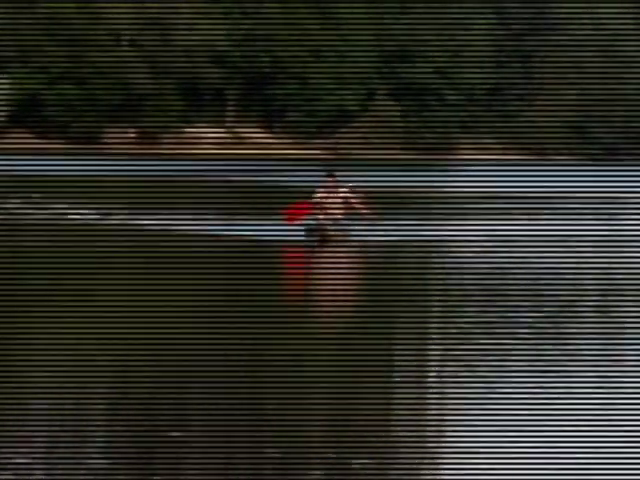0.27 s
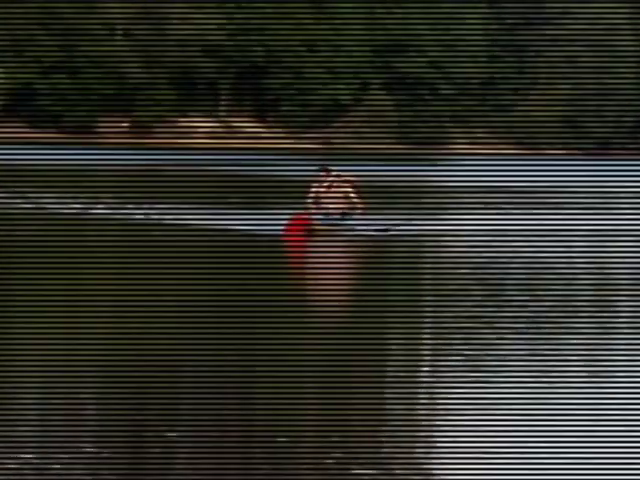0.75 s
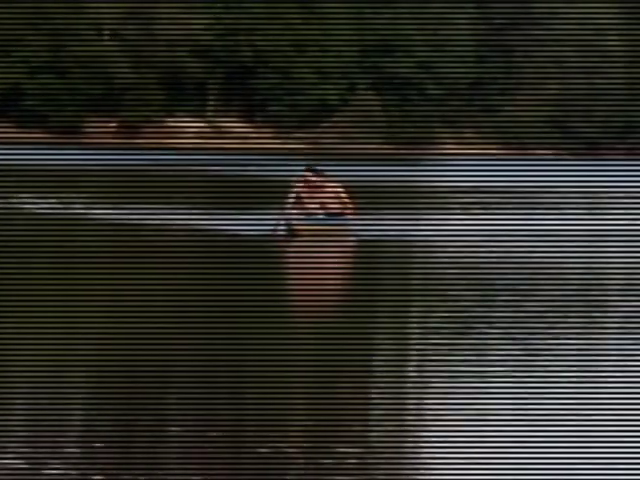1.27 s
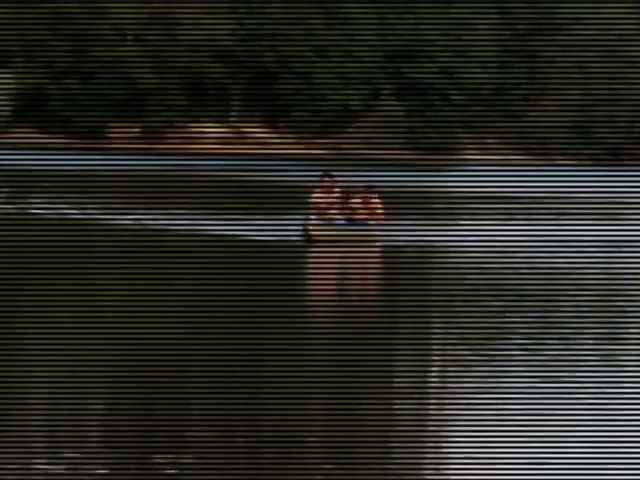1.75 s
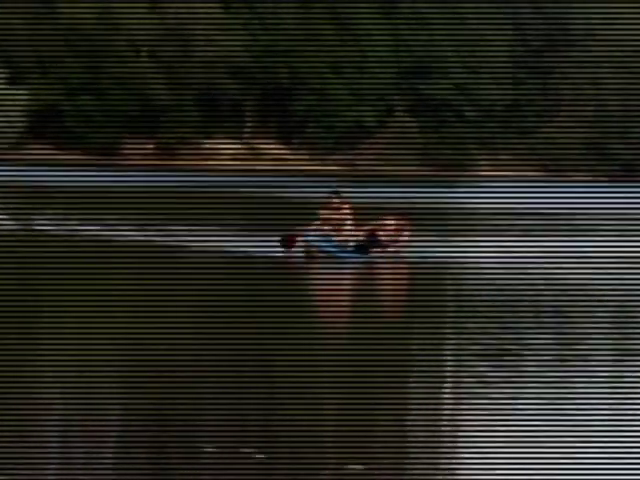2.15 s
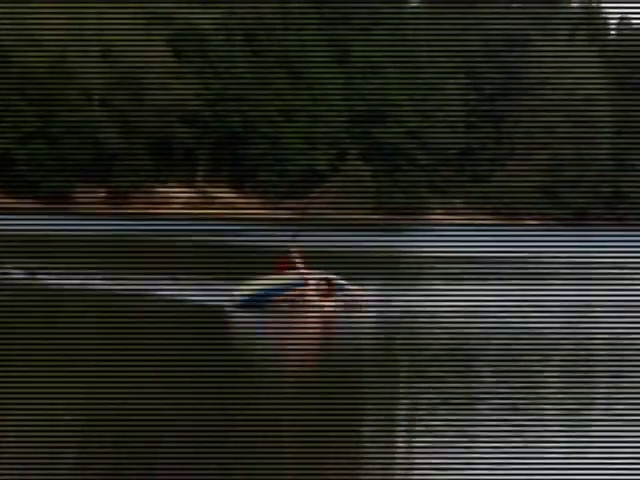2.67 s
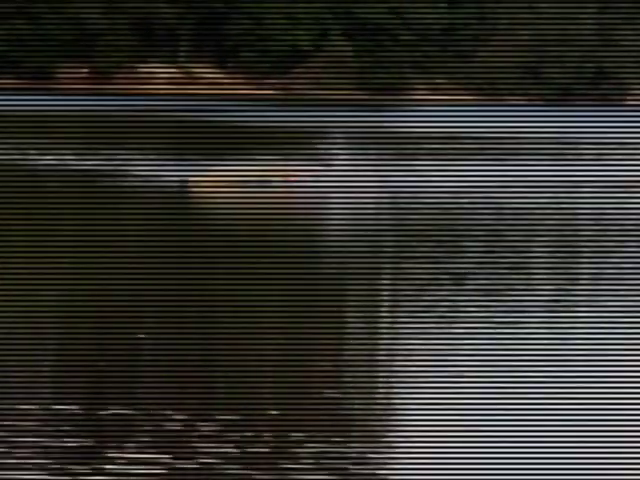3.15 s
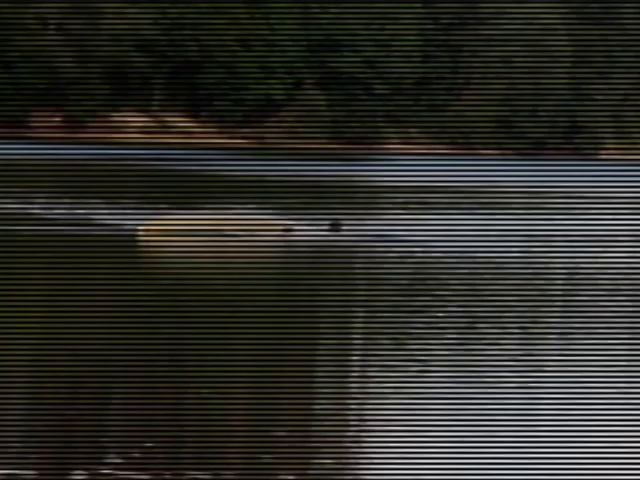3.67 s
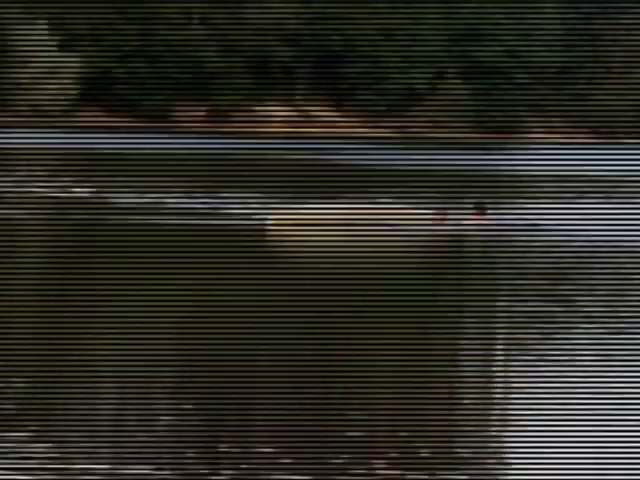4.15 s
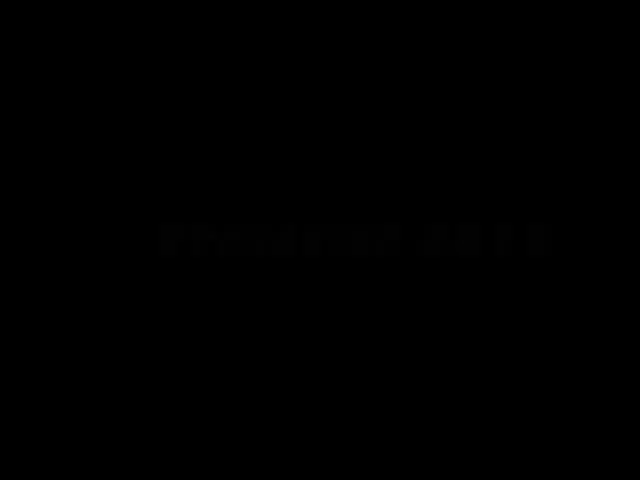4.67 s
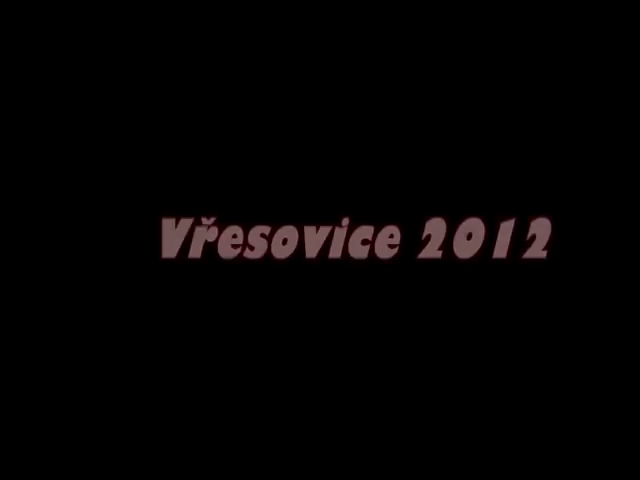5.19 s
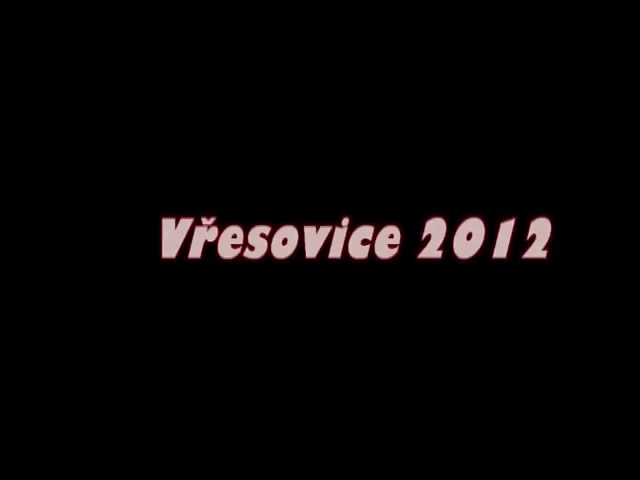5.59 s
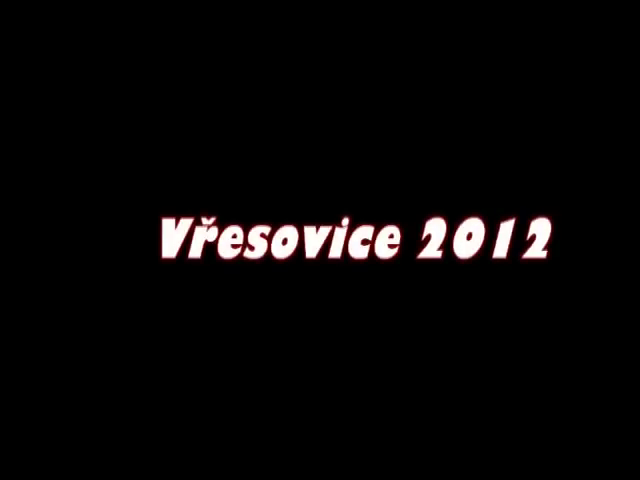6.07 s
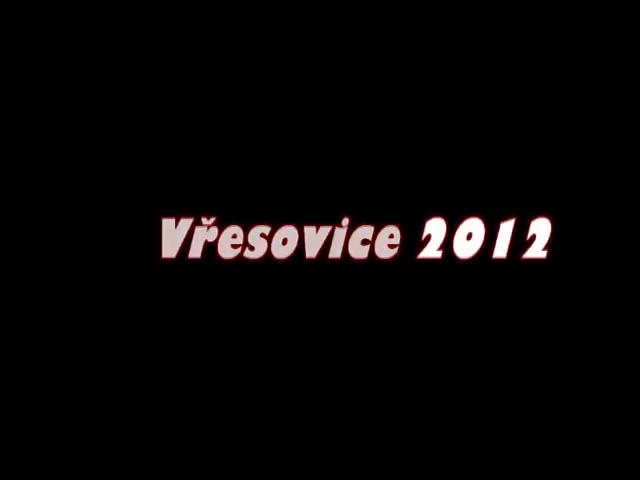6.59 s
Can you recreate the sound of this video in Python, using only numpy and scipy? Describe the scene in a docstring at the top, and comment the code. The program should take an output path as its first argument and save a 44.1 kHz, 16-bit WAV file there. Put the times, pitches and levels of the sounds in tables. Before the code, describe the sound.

Water drips close by on a lake, making low, short plops at uneven intervals, many in quick little clusters. Light splashes and slaps fall between them, and now and then a small bubble rings and rises in pitch. The plops start sparse, then come louder and more often in the second half. A faint machine hum, low rumble and soft hiss lie far behind.

```python
"""Close water drips

Each drop ticks on the surface and shoves the water with a low plop. Its crater closes and snaps shut
with two more plops and throws up a jet that falls back softly. Splashes slap in between, and now and
then a trapped bubble rings and rises in pitch. Behind it lie a faint machine hum, a soft swelling
tone, low rumble and hiss."""
import sys
import numpy as np
from scipy import signal
from scipy.fft import rfft, irfft, next_fast_len
from scipy.io import wavfile
from scipy.ndimage import uniform_filter1d, map_coordinates

SR = 44100
rng = np.random.default_rng(int(sys.argv[2]) if len(sys.argv) > 2 else 0)


def inscribe(sig):
    """Save sig as 16-bit PCM at rate SR to the path in sys.argv[1].

    A 1-D sig is mono; a 2-D sig holds one channel per row.
    Samples are clipped to [-1, 1] before scaling.
    """
    pcm = np.round(np.clip(np.atleast_2d(sig).T, -1, 1) * 32767)
    wavfile.write(sys.argv[1], SR, pcm.astype(np.int16))


N = 301203
TIME = np.arange(N) / SR  # scene clock, s
AGE = np.arange(SR // 2) / SR  # age of one hit, s

# Drops that open a crater. Each row: start in seconds, impact level in dB, tick level in dB,
# delay in seconds and level in dB of the walls rushing in, then the same two for the crater shutting.
DRIPS = [(.0048, -17.5, -19, 0.027, -15.5, 0.039, -20), (0.5708, -21, -35, 0.027, -21.5, 0.034, -29),
         (1.6144, -7, -32.5, 0.018, -12, .032, -13.5), (2.5133, -7.5, -46, 0.031, -12, .045, -8),
         (3.247, -7.5, -26, .033, -14, 0.046, -12.5), (3.742, -6.5, -26, 0.03, -14, .044, -9.5),
         (3.9511, -9, -32.5, .029, -9.5, 0.043, -7), (4.482, -9.5, -37, 0.036, -8.5, 0.052, -11),
         (5.0561, -8.5, -26.5, .035, -9.5, .047, -9.5), (5.7036, -11, -29.5, 0.03, -18, .042, -14.5),
         (5.9658, -8, -29.5, .024, -15.5, 0.041, -13.5), (6.5666, -8.5, -27, 0.023, -13.5, 0.04, -8.5)]
# Plops without a crater. Each row: start in seconds, level in dB, base pitch in Hz, t60 in seconds,
# deep boom in dB against the plop.
LONE_PLOPS = [(.348, -37, 205, 0.038, -17), (.4315, -10.5, 156, 0.032, -4.5),
              (1.7532, -23.5, 217, 0.028, -4), (2.799, -36, 168, 0.07, -4),
              (3.4038, -12.5, 196, .044, -6.5), (3.5027, -24, 169, 0.07, -12), (3.5678, -25, 173, .06, -6),
              (5.618, -29.5, 197, 0.0094, -17.5), (5.8633, -17, 194, 0.023, -12),
              (6.2157, -14, 188, 0.087, -32)]
# The shoves in a crater's life. Each: base pitch in Hz, t60 in seconds, boom in dB against the plop.
IMPACT, CLOSING = (181, 0.015, -1.8), (171.3, 0.025, -16.5)
SHUT, JET = (182, 0.014, -4.5), (170, 0.052, -1)
# Trapped air. Each row: start in seconds, level in dB, base pitch in Hz, seconds to reach the surface.
BUBBLES = [(.0015, -13, 5100, 0.065), (.002, -22, 2820, .04), (.037, -12, 1228, 0.043),
           (0.129, -36, 2750, 0.0069), (0.571, -29, 3190, .006), (1.7566, -7, 2864, 0.01),
           (1.766, -4.5, 2550, 0.51), (4.532, -11, 4775, .06), (4.532, -18, 2130, 0.024),
           (4.533, -5, 1322, 0.047), (4.541, -18, 1820, 0.013), (4.558, -24.5, 1237, .03),
           (4.583, -30.5, 1950, .019), (4.604, -26.5, 2290, 0.011), (4.721, -34.5, 3900, .05),
           (5.104, -6.5, 1075, .085), (5.104, -19, 1385, 0.0099), (5.168, -27, 1700, 0.0054),
           (6.619, -6, 1788, 0.031), (6.623, -6, 1934, .17), (6.628, -15, 1605, 0.034),
           (6.64, -26, 3000, 0.0079), (6.655, -22.5, 1900, 0.014), (6.712, -34, 2580, 0.0062)]
# Splashes and the spray landing after them. Each row: start in seconds, relative level in dB,
# t60 in seconds, brightness in dB per octave.
SPLASHES = [(.0015, -6.5, 0.0084, -2), (.0387, -13.5, 0.018, -2.5), (.054, -19, 0.0073, 3),
            (.108, -31, 0.0082, 4), (.270, -34, 0.0099, -7.5), (.5712, -18.5, 0.0075, -11.5),
            (.80, -38.5, 0.031, -13), (1.7565, -10, 0.0018, -8), (1.7662, -20.5, 0.0095, 2),
            (3.4046, -21.5, 0.0043, 3), (3.406, -26, 0.024, -19), (3.565, -38, .04, -13.5),
            (4.531, -14.5, 0.017, 3), (4.658, -34.5, 0.0078, 34), (4.712, -27.5, 0.009, -12),
            (5.1035, -8.5, .016, -7), (5.864, -29, 0.0065, 1), (5.954, -16, 0.011, -18),
            (6.5913, -26, 0.018, 12), (6.610, -30, 0.022, 12), (6.619, -15.5, 0.034, -1),
            (6.625, -13, 0.015, -2), (6.770, -37, 0.01, 2)]
# A drop's surface noises. Each: t60 in seconds, brightness in dB per octave.
TICK, DULL_SLAP = (0.0041, 0.86), (0.014, -17)
# The ring of a sharp tick. Each row: pitch in Hz, relative level in dB, t60 in seconds.
TICK_MODES = [(2828, 2, 0.0095), (4793, -2, 0.011), (5600, -8, 0.015)]
# EQ curves for the noise layers. Each row: frequency in Hz, relative level in dB.
SMACK_EQ = [(150, -11.5), (330, -37.5), (450, 16), (720, 1.5), (950, -9), (1400, -5), (2500, -39.5),
            (5000, -86.5)]
SWAY_EQ = [(10, -15.5), (26, 11), (40, -4), (70, -9.5), (120, -16.5), (220, -15), (400, -26.5),
           (800, -85.5)]
SPRAY_EQ = [(250, -22.5), (650, 1.5), (900, -11), (1500, 1), (2200, 3), (2900, 3), (3600, 3), (4200, 0),
            (5000, 0), (5600, -14.5), (6300, -4.5), (7100, -39.5), (8000, -32), (18000, -86)]
RUMBLE_EQ = [(15, -6.5), (45, -17.5), (62, -5.5), (105, -1.5), (140, -7), (175, -6), (240, -13.5),
             (330, -22.5), (600, -46.5), (1000, -85.5)]
HISS_EQ = [(120, -27.5), (300, -6), (480, -9), (700, -11), (1200, -11), (3700, -13.5), (5500, -20),
           (6500, -30), (7300, -44), (9000, -64.5), (12000, -110)]
# The tail of the surroundings. Each row: frequency in Hz, t60 in seconds.
ECHO_DECAY = [(40, 0.19), (200, 0.36), (1000, 0.09), (2000, 0.27), (6000, 0.073)]
# The machine's harmonics. Each row: multiple of the motor's pitch, relative level in dB.
HUM_HARMONICS = [(1, -51), (2, -61.5), (3, -59.5), (5, -57.5), (6, -70.5), (7, -63.5), (9, -72),
                 (10, -93.5), (11, -68), (13, -69), (17, -90)]
# Swells of the low tone. Each row: crest time in seconds, pitch in Hz, relative level in dB.
DRONE_SWELLS = [(1.201, 139.8, -54.5), (2.648, 132.6, -43), (3.251, 131, -40), (5.55, 166.1, -55.5),
                (6.5, 163.5, -43.5)]
# Fader moves for the noise bed. Each row: time in seconds, relative rumble and hiss levels in dB.
BED_FADERS = [(0.0, -23, -50), (0.21, -45, -55), (0.84, -47, -52.5), (1.14, -46, -51.5), (3.14, -43, -50.5),
              (3.42, -31.5, -49.5), (5.0, -48.5, -53), (5.55, -47.5, -53), (5.99, -34, -52),
              (6.41, -47.5, -49.5), (6.83, -56, -54.5)]


def shove_cues(jet_delay_s=0.16, jet_db=-22):
    """A drop strikes, its crater closes and snaps shut, its jet falls back; lone plops come between."""
    cues = []
    for start, db, _, closing_s, closing_db, shut_s, shut_db in DRIPS:
        cues += [(start, db, *IMPACT), (start + closing_s, closing_db, *CLOSING),
                 (start + shut_s, shut_db, *SHUT), (start + jet_delay_s, db + jet_db, *JET)]
    return cues + list(LONE_PLOPS)


def plops(attack_s=0.005, glide=0.36, glide_t60=0.04, steepen=0.82, smack_db=-19, smack_t60=0.028,
          boom_hz=71, boom_t60=0.15, boom_lag_s=0.0027, sway_db=-30, sway_t60=0.59):
    """Each shove swells, sinks in pitch, dies fast and leaves the body of water booming and swaying."""
    out = np.zeros(N)
    for start, db, hz, t60, boom_db in shove_cues():
        attack = 1 - np.exp(-(AGE / attack_s) ** 3)
        envelope = attack * fade(t60)
        pitch = hz * (1 + glide * fade(glide_t60))
        shove = envelope / envelope.max() * np.cos(phase_of(pitch))
        # hard shoves have pointed crests and a dull smack
        shove *= 1 + steepen * (amp(db) * shove) ** 2
        smack_envelope = attack * fade(smack_t60)
        smack = amp(smack_db + db) * smack_envelope / smack_envelope.max() * noise(SMACK_EQ, len(AGE))
        boom = -amp(boom_db) * attack * fade(boom_t60) * np.sin(2 * np.pi * boom_hz * (AGE - boom_lag_s))
        sway = amp(sway_db) * attack * fade(sway_t60) * noise(SWAY_EQ, len(AGE))
        add(out, start, amp(db) * (shove + smack + boom + sway))
    return out


def bubbles(pinch_s=0.00037, ring_cycles=82.6, overtone_db=-27, settle=0.08, settle_t60=0.016,
            drift=0.12, climb=0.37, burst_width=0.054):
    """A bubble rings as it pinches off, settles, climbs in pitch as it rises and bursts at the top."""
    out = np.zeros(N)
    for start, db, hz, rise_s in BUBBLES:
        height = np.minimum(AGE / rise_s, 2)  # 1 is the surface
        bend = np.minimum(height, 1.1)
        phase = phase_of(hz * (1 + settle * fade(settle_t60) + drift * bend + climb * bend ** 3))
        submerged = (1 - np.tanh((height - 1) / burst_width)) / 2
        ring = fade(ring_cycles / hz)  # small, high bubbles are brief
        envelope = (1 - np.exp(-AGE / pinch_s)) * ring * submerged
        overtone = amp(overtone_db) * envelope * np.sin(2 * phase)
        add(out, start, amp(db) * envelope * (np.sin(phase) + overtone))
    return out


def slap_cues(tick_db=-25, lag_s=0.00306, slap_db=-2.5, growth=2.46):
    """The surface ticks as a drop lands and its crater closes; hard shoves slap; splashes go on top."""
    cues = []
    for start, db, landing_db, closing_s, closing_db, shut_s, shut_db in DRIPS:
        cues += [(start, landing_db, *TICK), (start + closing_s, closing_db + tick_db, *TICK)]
        for delay, shove_db in [(0, db), (closing_s, closing_db), (shut_s, shut_db)]:
            cues.append((start + delay + lag_s, slap_db + growth * shove_db, *DULL_SLAP))
    return cues + list(SPLASHES)


def slaps(attack_s=0.00061, gain_db=1, ring_db=-1, fizz_db=-28, fizz_t60=0.083):
    """The surface breaks with a ringing tick and a burst of spray; fine droplets fizz on after it."""
    out = np.zeros(N)
    attack = 1 - np.exp(-AGE / attack_s)
    for start, db, t60, tilt_db in slap_cues():
        grains = np.repeat(rng.exponential(size=len(AGE)), 40)[:len(AGE)]
        droplets = uniform_filter1d(grains, 20)
        envelope = fade(t60) + amp(fizz_db) * fade(fizz_t60) * droplets
        ring = np.zeros(len(AGE))
        for hz, mode_db, mode_t60 in TICK_MODES:
            gain = amp(mode_db + rng.normal(0, 0.39))
            pitch = hz * rng.lognormal(0, 0.017)
            ring += gain * fade(mode_t60) * np.sin(2 * np.pi * pitch * AGE)
        ring *= amp(ring_db + 2 * min(tilt_db, 0))  # dull slaps hardly ring
        spray = envelope * noise(SPRAY_EQ, len(AGE), tilt_db)
        add(out, start, amp(db + gain_db) * attack * (spray + ring))
    return out


def echo(send):
    """The surroundings answer with a diffuse tail; the bass hangs on longest."""
    hz, _, bands = signal.stft(rng.standard_normal(len(AGE)), SR, nperseg=256)
    age = np.linspace(0, AGE[-1], bands.shape[1])
    decay = amp(-60 * age / along(ECHO_DECAY, hz)[:, None])
    tail = signal.istft(bands * decay, SR, nperseg=256)[1]
    return signal.fftconvolve(send, tail / np.linalg.norm(tail))[:N]


def machine_hum(motor_hz=79.45, start_s=0.76, fade_in_s=0.053, gain_db=0.28, waver_db=1.77):
    """A machine comes in and holds, humming mostly on odd harmonics that each waver in level."""
    phase = 2 * np.pi * motor_hz * TIME + 0.055 * wobble(2.3)
    hum = np.zeros(N)
    for multiple, db in HUM_HARMONICS:
        gain = np.sqrt(2) * amp(db + gain_db + waver_db * wobble(1.9))
        hum += gain * np.sin(multiple * phase + 2 * np.pi * rng.random())
    return hum * np.clip((TIME - start_s) / fade_in_s + 0.5, 0, 1)


def noise_bed(rumble_trim_db=-4.5, hiss_trim_db=0.5):
    """Low rumble and soft hiss, each riding its own fader."""
    times, rumble_db, hiss_db = np.transpose(BED_FADERS)
    rumble = amp(np.interp(TIME, times, rumble_db) + rumble_trim_db) * noise(RUMBLE_EQ, N)
    hiss = amp(np.interp(TIME, times, hiss_db) + hiss_trim_db) * noise(HISS_EQ, N)
    return rumble + hiss


def drone(half_swell_s=0.11, rest_db=-58, gain_db=-1, waver_hz=3, waver_db=2.4):
    """A soft, wavering low tone swells now and then, far back in the mix."""
    crests, pitches, _ = np.transpose(DRONE_SWELLS)
    phase = phase_of(np.interp(TIME, crests, pitches) + waver_hz * wobble(15))
    swells = sum(amp(db) / (1 + ((TIME - crest) / half_swell_s) ** 2) for crest, _, db in DRONE_SWELLS)
    return (amp(rest_db) + swells) * amp(gain_db + waver_db * wobble(12)) * np.sqrt(2) * np.sin(phase)


def amp(db):
    """Decibels to gain."""
    return 10 ** (np.asarray(db) / 20)


def fade(t60):
    """Exponential decay, 60 dB down after t60 seconds."""
    return np.exp(-np.log(1000) * AGE / t60)


def phase_of(hz):
    """Running phase of a moving pitch."""
    return 2 * np.pi * np.cumsum(hz) / SR


def along(curve, hz):
    """Read a curve of (Hz, value) points on a log frequency axis."""
    freqs, values = np.transpose(curve)
    return np.interp(np.log(hz + 1), np.log(freqs + 1), values)


def wobble(rate):
    """Smooth random modulation, rate points a second."""
    return map_coordinates(rng.standard_normal(int(N * rate / SR) + 4), [TIME * rate])


def filtered(x, response):
    """EQ x with a gain given as a function of Hz."""
    size = next_fast_len(len(x) + 8192)
    return irfft(rfft(x, size) * response(np.fft.rfftfreq(size, 1 / SR)), size)[:len(x)]


def noise(eq, size, tilt_db=0):
    """Coloured noise of rms 1, tilted by tilt_db per octave above the EQ's second point."""
    colour = lambda hz: amp(along(eq, hz) + tilt_db * np.log2(np.maximum(hz, eq[1][0])))
    x = filtered(rng.standard_normal(size), colour)
    return x / np.sqrt(np.mean(x ** 2) + 1e-20)


def add(track, start_s, sound):
    """Lay a sound into the track."""
    start = max(round(start_s * SR), 0)
    track[start:start + len(sound)] += sound[:max(N - start, 0)]


def scene(low_send_db=-23, high_send_db=-25):
    """Close water up front, its faint echo and the background behind, in mono."""
    low, high = plops(), bubbles() + slaps()
    tail = echo(amp(low_send_db) * low + amp(high_send_db) * high)
    return (low + high + tail + machine_hum() + noise_bed() + drone())[None]


def record(dry, ceiling=0.74, shelf_hz=7400, shelf_db=-17, top_hz=15400):
    """Round off the highest peaks, shelve the treble down steeply and cut the very top."""
    rounded = dry[0] / (1 + np.abs(dry[0] / ceiling) ** 8) ** (1 / 8)
    shelf = lambda hz: amp(shelf_db) + (1 - amp(shelf_db)) / np.sqrt(1 + (hz / shelf_hz) ** 50)
    return filtered(rounded, lambda hz: shelf(hz) * (hz < top_hz))[None]


dry = scene()
out = record(dry)
inscribe(out)
```